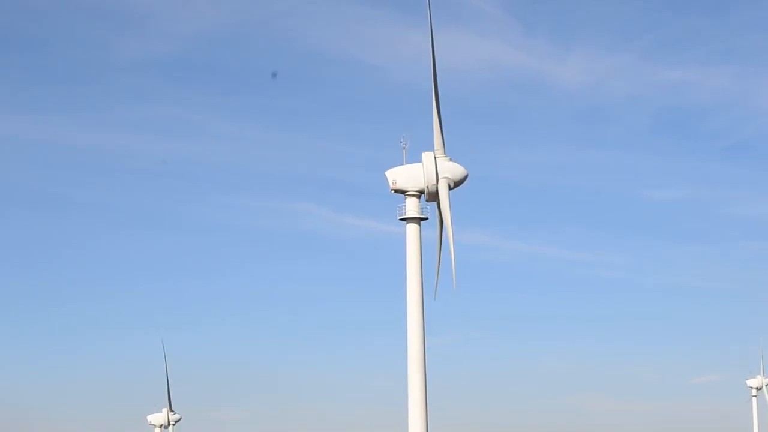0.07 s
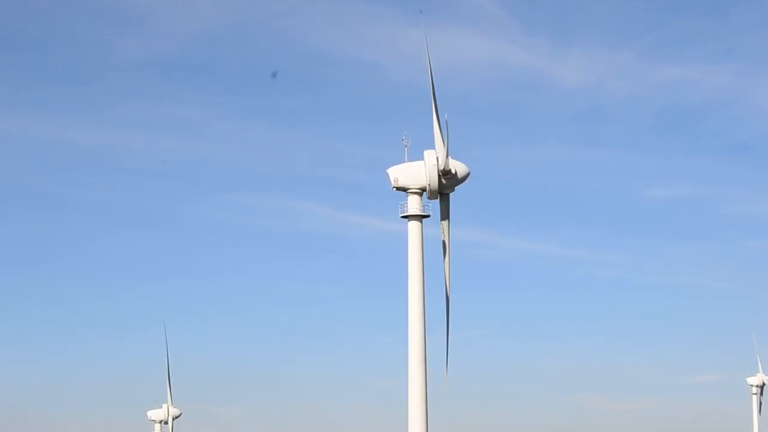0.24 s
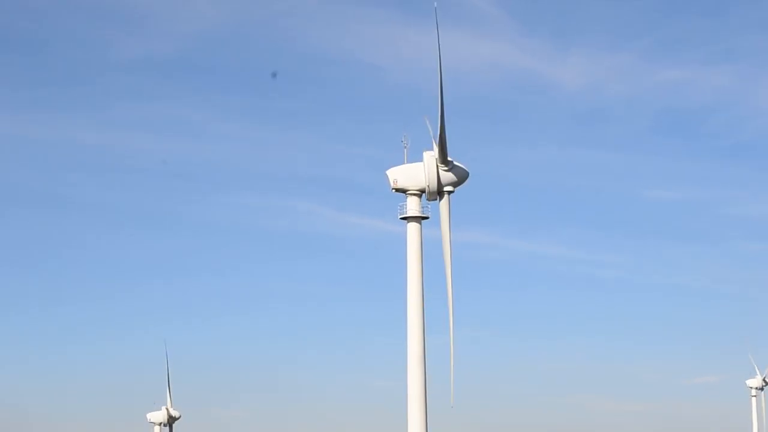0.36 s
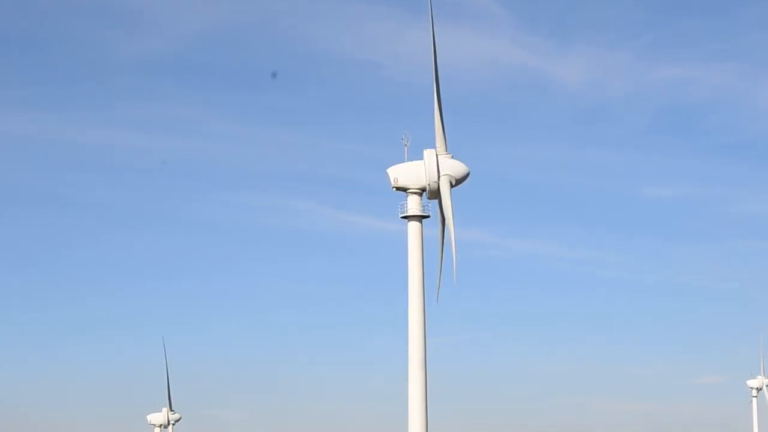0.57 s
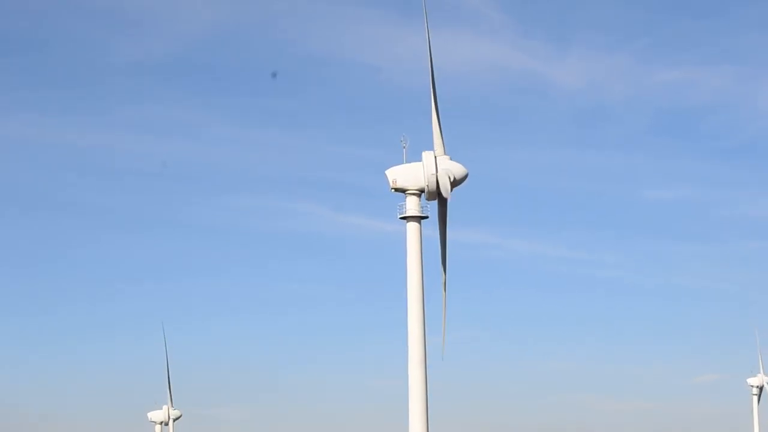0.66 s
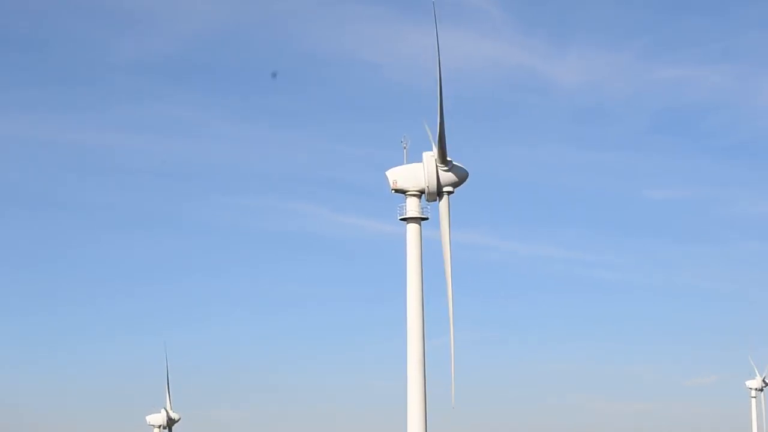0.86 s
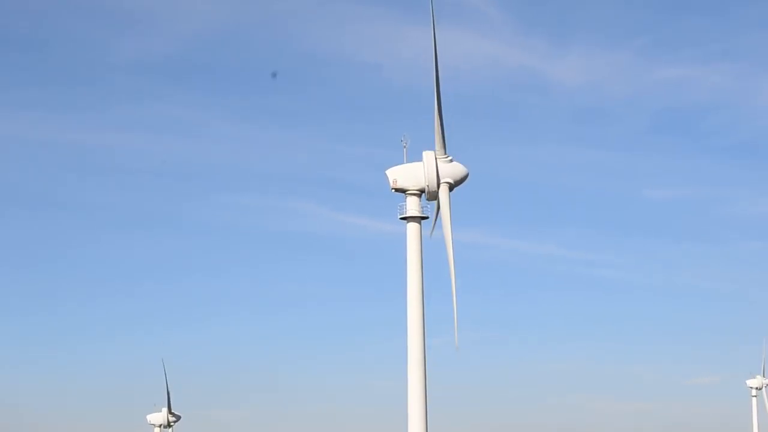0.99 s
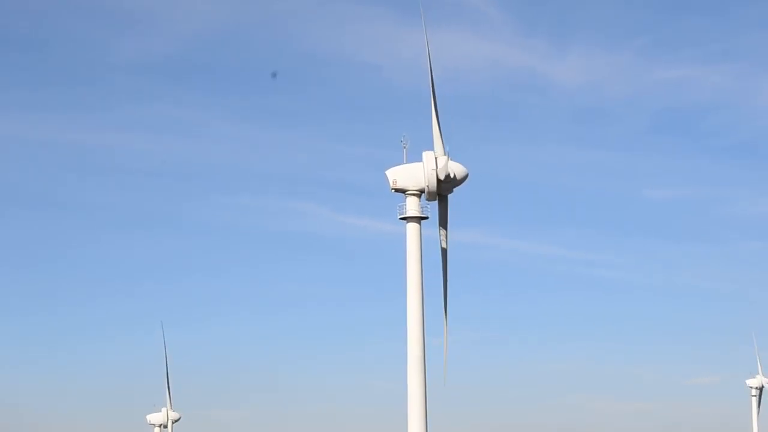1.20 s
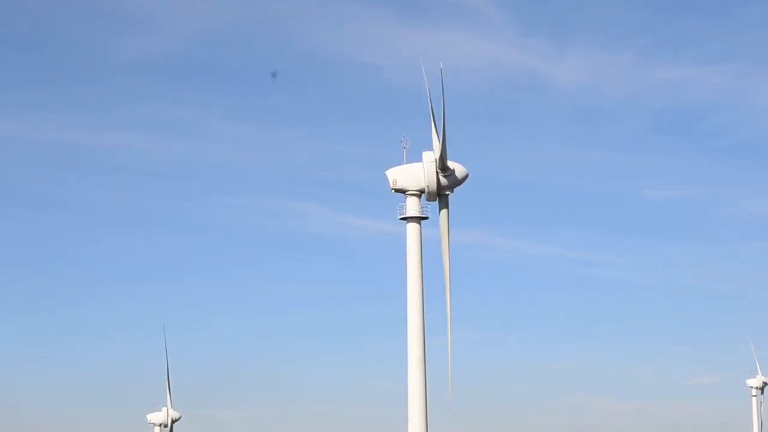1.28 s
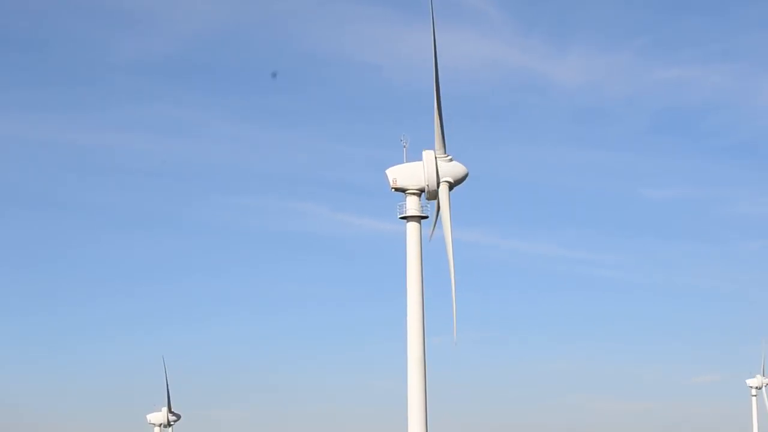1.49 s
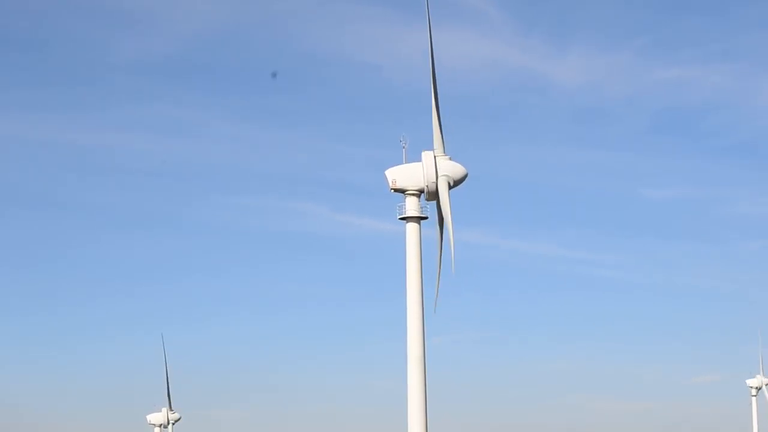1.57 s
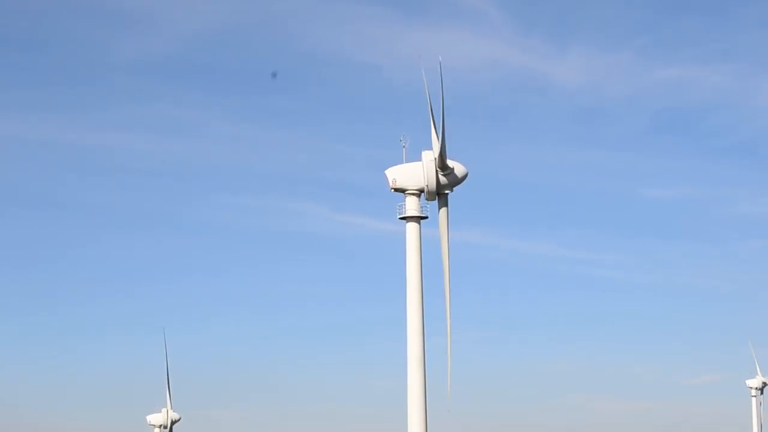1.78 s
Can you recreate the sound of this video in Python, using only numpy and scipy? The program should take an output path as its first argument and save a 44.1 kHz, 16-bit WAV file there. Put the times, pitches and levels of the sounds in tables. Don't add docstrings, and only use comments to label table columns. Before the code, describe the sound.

Soft, regular blade whooshes from a nearby turbine outdoors; early on a violent wind gust thumps and clips the unprotected microphone, fades into scattered puffs, then a shorter second gust hits before quiet swishing returns.

```python
import sys
import numpy as np
from scipy import signal
from scipy.fft import rfft, irfft, next_fast_len
from scipy.io import wavfile
from scipy.ndimage import uniform_filter1d, map_coordinates

SR = 44100
rng = np.random.default_rng(int(sys.argv[2]) if len(sys.argv) > 2 else 0)


def unload_wav(signal):
    wavfile.write(
        sys.argv[1],
        SR,
        np.round(np.clip(np.atleast_2d(signal).T, -1, 1) * 32767).astype(np.int16),
    )


def elevation(decibels):
    levels = np.asarray(decibels, float)
    return 10 ** (levels / 20)


N = 81585

# f/Hz, density/dB per Hz
FAR_SPECTRUM = [(100, -30), (300, 2.5), (1300, -2.5), (3200, -7.5), (5500, -15.5), (8000, -22.5),
                (9500, -18), (11400, -36.5)]
# t/s, level/dB
BLADE_PASSES = [
    (0.112, -39),
    (0.608, -40),
    (1.1, -39.5),
    (1.6, -40),
    (2.08, -30.5),
]
# f/Hz, density/dB per Hz
SWISH_SPECTRUM = [(120, -26), (250, -6), (450, -11.5), (880, -3), (1570, -2), (2000, -3), (4090, -19.5),
                  (11200, -30)]
# f/Hz, density/dB per Hz
TEARING_SPECTRUM = [(1200, -17), (2000, -6), (2500, 2.5), (3300, 0.5), (4700, -3.5), (5300, -25),
                    (7000, -40)]
# f/Hz, density/dB per Hz
EDGE_SPECTRUM = [(3000, 15), (5000, -47), (6500, 4), (7900, -7), (8800, 5.5), (10300, 1.5), (11300, -27)]
# t/s, level/dB
RUMBLE_LEVEL = [(0.0, -33.5), (0.036, -39), (0.066, -34), (0.132, -36.5), (0.282, -15), (0.308, -24),
                (0.704, -32.5), (0.742, -36.5), (0.798, -28.5), (0.824, -39.5), (1.034, -33),
                (1.102, -37.5), (1.204, -30.5), (1.338, -26.5), (1.426, -50), (1.472, -34), (1.52, -57.5),
                (1.85, -44)]
# f/Hz, density/dB per Hz
RUMBLE_SPECTRUM = [(15, -30), (30, -10.5), (80, -4.5), (150, -2), (300, -12), (800, -34.5)]
# t/s, peak level/dB, size f/Hz
WIND_EDDIES = [(0.074, -24.5, 160), (0.185, -19.5, 250), (0.206, -17, 420), (0.227, -16, 186),
               (0.24, -11, 400), (0.253, -7.5, 356), (0.265, -26, 204), (0.277, 1.5, 220),
               (0.284, 1, 470), (0.294, -3, 303), (0.3, -13, 236), (0.315, -6.5, 464),
               (0.323, -8.5, 390), (0.338, -32, 275), (0.354, -3.5, 390), (0.368, -3.5, 250),
               (0.379, -10, 191), (0.392, -8, 230), (0.404, 2, 600), (0.417, -5, 217),
               (0.427, -6.5, 253), (0.436, -0.5, 745), (0.446, -10, 537), (0.457, -5.5, 250),
               (0.467, -12.5, 217), (0.486, -5, 495),
               (0.503, -12.5, 346), (0.515, -17.5, 161), (0.533, -12, 286), (0.54, -2, 333),
               (0.552, -13, 342), (0.569, -7, 320), (0.585, -10.5, 258), (0.62, -20, 219),
               (0.642, -17, 293), (0.672, -9, 227), (0.686, -10.5, 354), (0.739, -20.5, 236),
               (0.795, -19.5, 163), (0.92, -18.5, 272), (0.949, -16, 410), (0.971, -16, 242),
               (1.014, -22.5, 217), (1.437, -23.5, 168), (1.478, -20, 187), (1.846, -29.5, 348),
               (1.15, -11, 440), (1.168, -11.5, 474), (1.18, -7, 297), (1.191, -11, 339),
                      (1.202, 3, 450), (1.208, -2.5, 406), (1.223, -4, 525), (1.231, -7, 265),
                      (1.252, -14.5, 274), (1.262, -30, 157), (1.282, -5, 264), (1.294, -0.5, 470),
                      (1.315, -27, 249.4), (1.323, -2.5, 477), (1.33, -7, 357), (1.35, -32, 134),
               (.398, -12, 900),
    (.4318, -9, 1100),
    (.4346, 2, 1700),
    (.324, -24, 800),
    (1.2955, -12, 600),
    (.951, -24, 600),
    (.4365, -4, 500),
    (1.197, -5, 330),
    (.4035, -11, 950),
               (.821, -24, 230),
    (.858, -27, 280),
    (1, -25.5, 230),
    (.679, -15.5, 510),
]
# f/Hz, density/dB per Hz
FLUTTER_SPECTRUM = [(40, -36), (90, -5), (250, 0), (600, -9), (1100, -12.5), (2500, -38), (5000, -71)]
# t/s, height/full scale
PRESSURE_JOLTS = [
    (.5317, -.6),
    (.5407, 1.2),
    (1.3168, .85),
    (.6733, -.4),
    (1.4775, -.13),
    (1.2952, -1.3),
    (1.2962, 1.3),
    (1.2015, -1.0),
    (1.2068, -1.0),
    (.4046, 1.1),
]
# from t/s, to t/s, kick in/full scale, kick out/full scale
CAPSULE_STALLS = [
    (.2687, .2742, -.35, -1.3),
    (.2862, .289, .25, .5),
    (.3029, .3108, .5, .2),
    (.3266, .3316, .33, .5),
    (.3368, .3425, -.5, -.2),
    (.4215, .4253, -.4, -.5),
    (.4526, .4562, .07, .5),
]

ECHO_S, ECHO_SHARE, ECHO_TOP_HZ = 1 / 783, 0.44, 9000
EDDY_CYCLES, EDDY_DB = 1, -3.5
EDDY_RISE, EDDY_CUT = 1.108, 0.97
FLUTTER_DB, FLUTTER_SPREAD_S = -9, 0.022
LUMP_DB = 2.5
JOLT_S, LOW_CUT_HZ = 0.00035, 68
KICK_POWER, KICK_FALL_S = 1.3, 0.0004
CLIP, TOP_HZ = 1.0, 11400


def unit(x):
    return x / np.sqrt(np.mean(x ** 2) + 1e-20)


def along(points, hz):
    f, v = np.transpose(points)
    return np.interp(np.log(hz + 1), np.log(f + 1), v, left=-120, right=-120)


def wobble(rate):
    knots = rng.standard_normal(int(N * rate / SR) + 4)
    return map_coordinates(knots, [np.arange(N) * rate / SR])


def filtered(x, response):
    m = next_fast_len(N + 8192)
    return irfft(rfft(x, m) * response(np.fft.rfftfreq(m, 1 / SR)), m)[:N]


def rush(spectrum, patchy_db):
    cells = signal.stft(rng.standard_normal(N), nperseg=512)[2]
    field = uniform_filter1d(rng.standard_normal(cells.shape), size=6, axis=0)
    field = uniform_filter1d(field, size=10, axis=1)
    noise = signal.istft(cells * elevation(patchy_db * unit(field)), nperseg=512)[1][:N]
    return unit(filtered(noise, lambda hz: elevation(along(spectrum, hz))))


def far_field():
    return elevation(-40 + 1.7 * wobble(5.36)) * rush(FAR_SPECTRUM, patchy_db=1.6)


def swell(rise_s, fall_s, lag_s):
    t = np.arange(N) / SR - lag_s
    power = 0
    for s, db in BLADE_PASSES:
        span = np.where(t < s, rise_s, fall_s)
        power = power + elevation(2 * db) * np.exp(-((t - s) / span) ** 2)
    return np.sqrt(power)


def swish():
    gain = elevation(6 + 0.91 * wobble(13.8)) * swell(0.15, 0.12, lag_s=0.016)
    return gain * rush(SWISH_SPECTRUM, patchy_db=0.4)


def tearing():
    gain = elevation(-1 + 1.2 * wobble(17.3)) * swell(0.14, 0.057, lag_s=0.016)
    return gain * rush(TEARING_SPECTRUM, patchy_db=2.1)


def edge_hiss():
    gain = elevation(-7 + 0.61 * wobble(23)) * swell(0.072, 0.1, lag_s=0.0093)
    return gain * rush(EDGE_SPECTRUM, patchy_db=-1.2)


def reflected(x):
    def response(hz):
        share = ECHO_SHARE / (1 + (hz / ECHO_TOP_HZ) ** 2)
        return 1 + share * np.exp(-2j * np.pi * hz * ECHO_S)
    return filtered(x, response)


def turbines():
    near = swish() + tearing() + edge_hiss()
    return reflected(near) + far_field()


def rumble():
    t, db = np.transpose(RUMBLE_LEVEL)
    gain = elevation(np.interp(np.arange(N) / SR, t, db) + 3)
    return gain * unit(elevation(LUMP_DB * wobble(24.72)) * rush(RUMBLE_SPECTRUM, patchy_db=0.0))


def eddies():
    events = WIND_EDDIES
    s, db, size_hz = np.transpose(events)
    size_hz = size_hz[:, None]
    width = 2048
    u = np.fft.rfftfreq(width, 1 / SR) / size_hz
    fall = np.exp(-(u / EDDY_CUT) ** 1.344) + 0.02 / (1 + u ** 2.27)
    swings = irfft(rfft(rng.standard_normal((len(s), width))) * u ** EDDY_RISE * fall)
    t = (np.arange(width) - width // 2) / SR
    bell = np.exp(-0.5 * (t * size_hz / EDDY_CYCLES) ** 2)
    swings = swings * bell
    evened = np.sqrt((bell ** 2).sum(1) / (swings ** 2).sum(1))
    swings = swings * (evened * elevation(db + EDDY_DB))[:, None]
    at = np.round(s * SR).astype(int)[:, None] + np.arange(width)
    return np.bincount(at.ravel(), swings.ravel(), N + 2 * width)[width // 2:][:N]


def flutter(gusts):
    strength = np.sqrt(np.abs(uniform_filter1d(gusts ** 2, int(FLUTTER_SPREAD_S * SR))))
    ragged = unit(elevation(LUMP_DB * wobble(90)) * rush(FLUTTER_SPECTRUM, patchy_db=3.0))
    return elevation(FLUTTER_DB) * strength * ragged


def jolts():
    t = np.arange(N) / SR
    return sum(height * np.exp(-0.5 * ((t - s) / JOLT_S) ** 2) for s, height in PRESSURE_JOLTS)


def buffeting():
    gusts = eddies()
    pressure = gusts + flutter(gusts) + jolts()
    return filtered(pressure, lambda hz: hz ** 2 / (hz ** 2 + LOW_CUT_HZ ** 2))


def scene():
    return (turbines() + buffeting() + rumble())[None]


def kick(t):
    u = np.maximum(t, 0) / KICK_FALL_S
    shape = u ** KICK_POWER * np.exp(-u)
    return shape / shape.max()


def stalled(x):
    t = np.arange(N) / SR
    for start, end, kick_in, kick_out in CAPSULE_STALLS:
        dying = np.exp(-np.maximum(t - start, 0) / 0.0001)
        waking = 1 - np.exp(-np.maximum(t - end, 0) / 0.0008)
        live = np.where(t < start, 1, np.where(t < end, dying, waking))
        x = x * live + kick_in * kick(t - start) + kick_out * kick(t - end)
    return x


def low_pass(x):
    return signal.sosfilt(signal.butter(12, 11380, fs=SR, output="sos"), x)


def record(dry):
    x = stalled(dry[0])
    x = filtered(x, lambda hz: 1 / (1 + (hz / TOP_HZ) ** 60))
    mix = np.clip(x, -CLIP, CLIP)[None]
    return low_pass(mix)


dry = scene()
out = record(dry)
unload_wav(out)
```